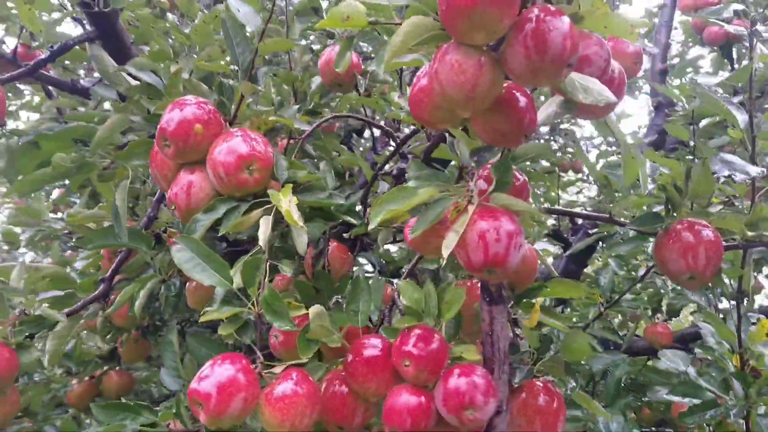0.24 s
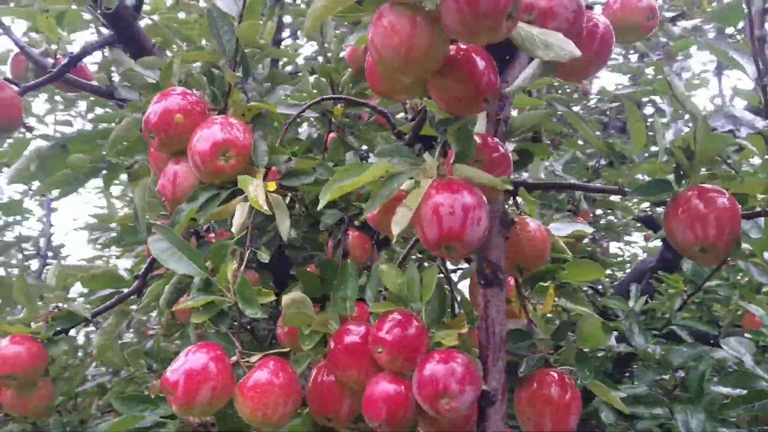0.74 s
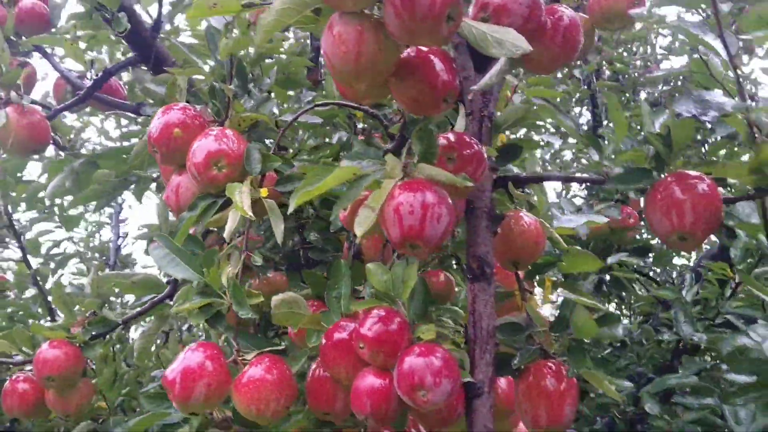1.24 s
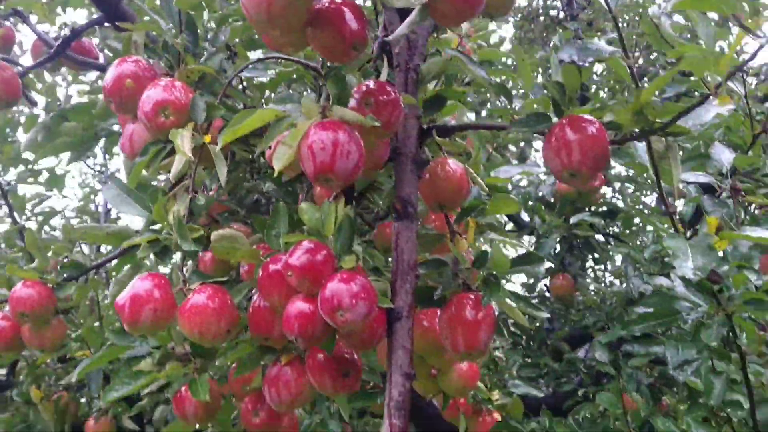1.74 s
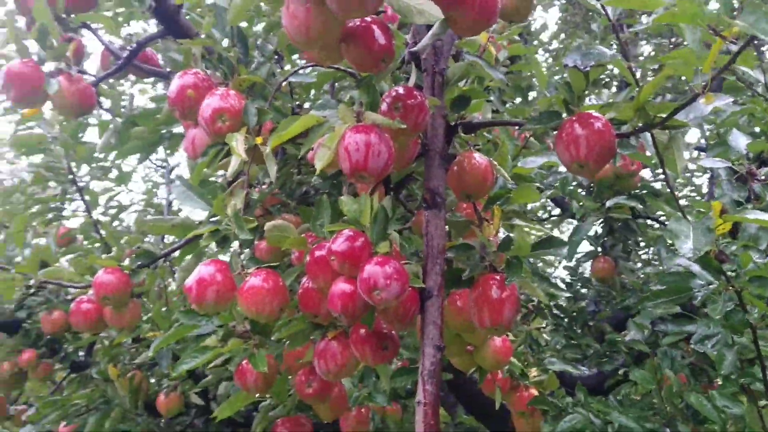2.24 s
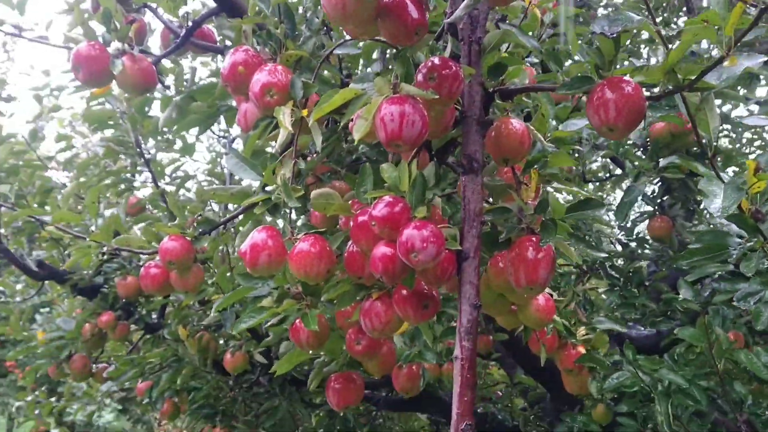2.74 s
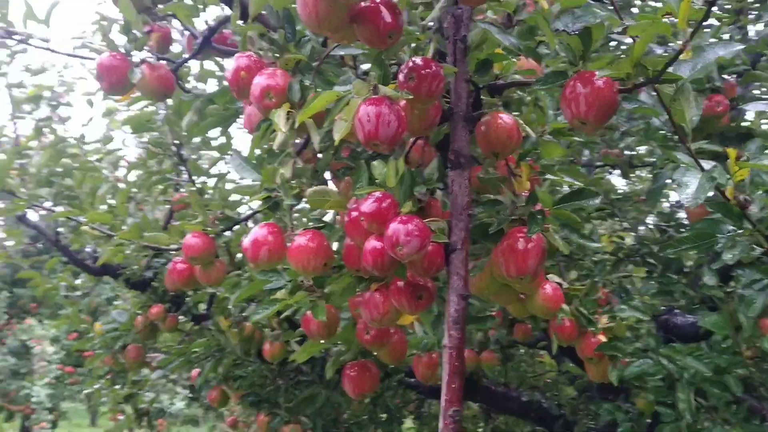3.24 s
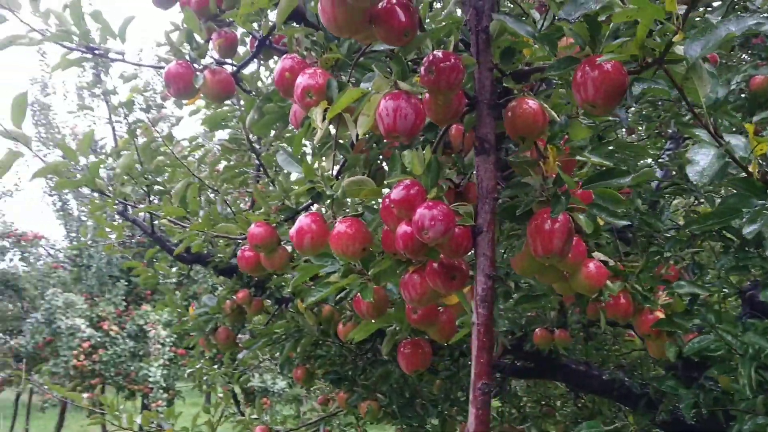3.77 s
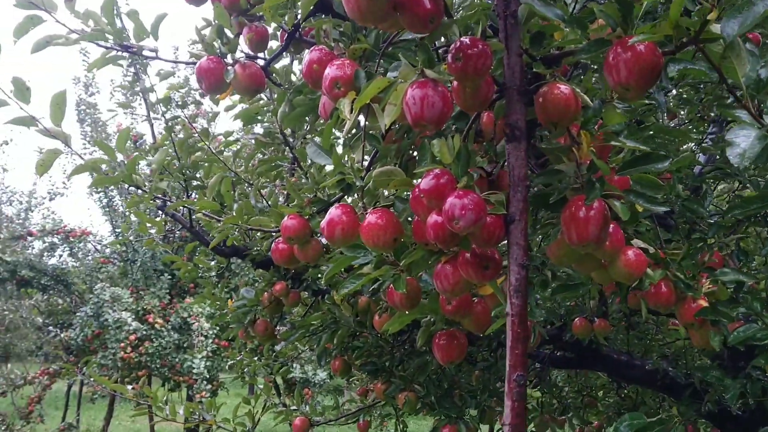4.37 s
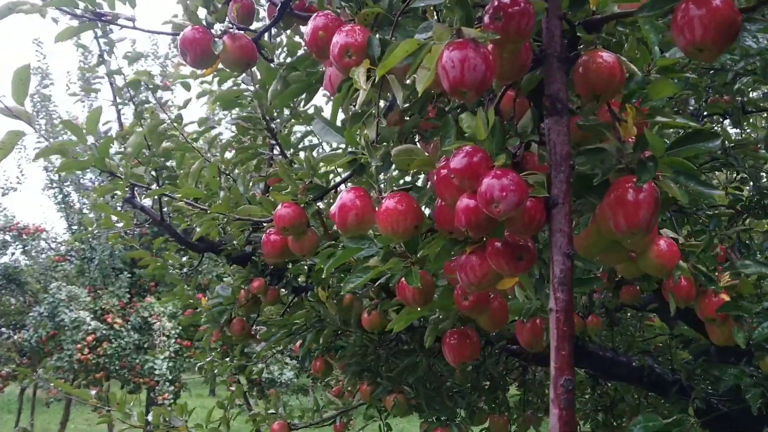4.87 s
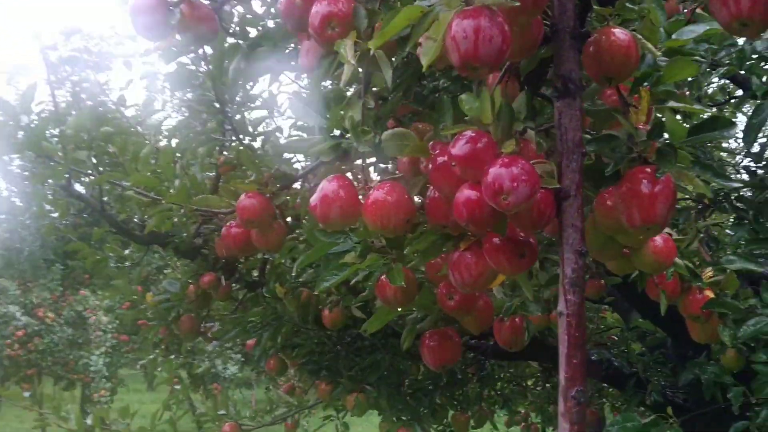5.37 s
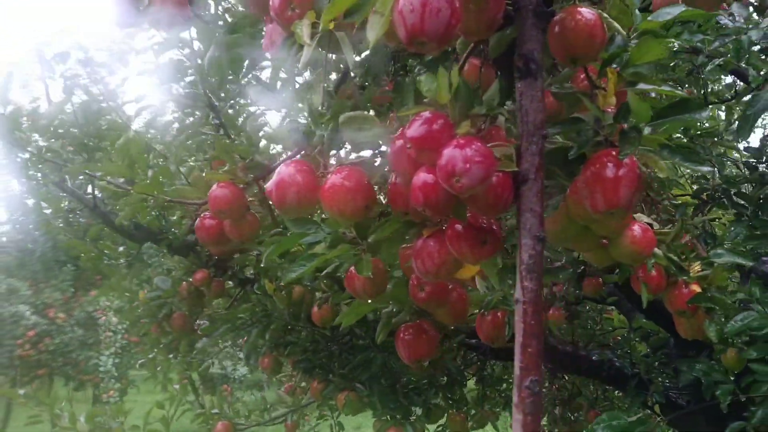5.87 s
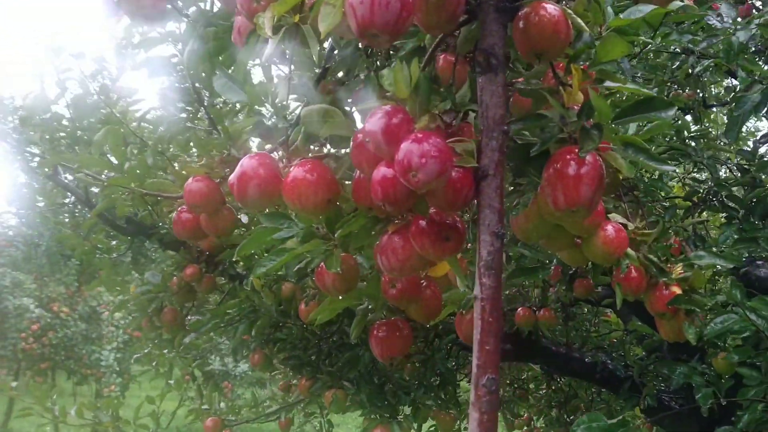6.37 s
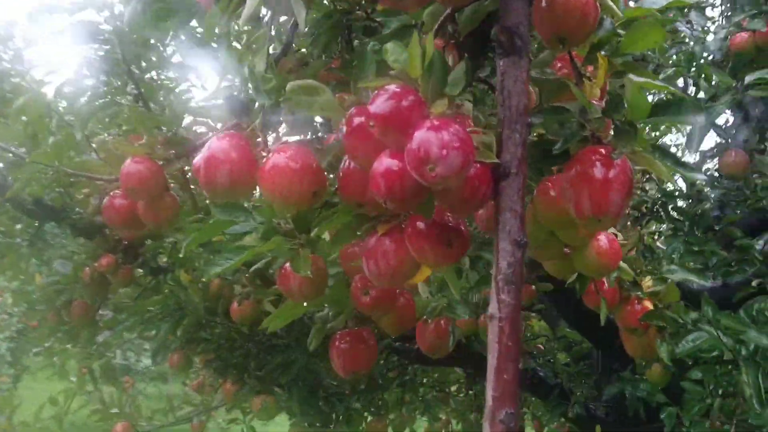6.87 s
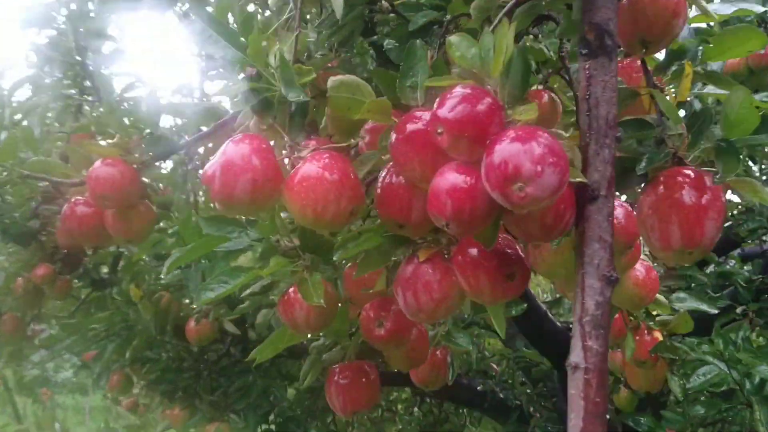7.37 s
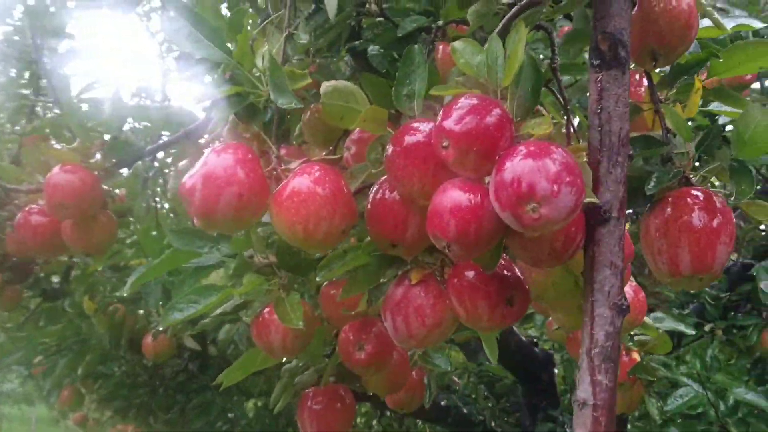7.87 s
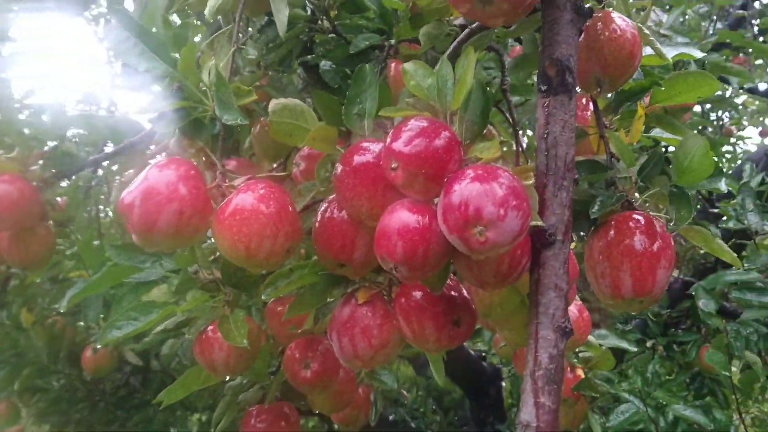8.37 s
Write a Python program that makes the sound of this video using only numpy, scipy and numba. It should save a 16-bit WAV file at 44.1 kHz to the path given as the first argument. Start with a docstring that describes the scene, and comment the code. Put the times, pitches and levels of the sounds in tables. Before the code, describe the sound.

Rain falls on apple tree leaves in an orchard, caught by a hand-held phone. Scattered sharp drops come first, then crowd into a dense patter with loud smacks, bright splashes and fine spatter, strongest around two and a half seconds. After four seconds it thins to light drips over a soft far hiss. One microphone side is muffled by a finger, which thumps briefly as it shifts.

```python
"""Big drops smack wet leaves close to a hand-held phone, in an orchard in the rain. Each is a set of swelling, dying
rings: leaf, thuds and splash. Smaller rings make a dense patter, fine spatter, splashes and hollow knocks on fruit.
Coloured noise makes the wash of the next trees, the hiss of the far rows and a low rumble, which holds a hum at first.
A finger covers the left microphone port: a filter makes that side faint, with a ring of trapped air,
and short pressure pulses thump there when the finger shifts."""
import sys
import numpy as np
from scipy import signal
from scipy.fft import rfft, irfft
from scipy.io import wavfile
from scipy.ndimage import uniform_filter1d
from numba import njit

SR = 44100
rng = np.random.default_rng(int(sys.argv[2]) if len(sys.argv) > 2 else 0)


def store_pcm(level_fs):
    """Save levels as 16-bit WAV."""
    pcm = np.round(np.clip(level_fs, -1, 1) * 32767).astype(np.int16)
    wavfile.write(sys.argv[1], SR, np.atleast_2d(pcm).T)


N = 379701  # length in samples

# big drops on leaves nearby, ahead of the body colour of close drops: (time [s], ring peak [dB], leaf pitch [Hz])
DROPS = [(0.1009, -18, 1980), (0.1517, -23.5, 1660), (0.1592, -8.5, 1670), (0.1776, -26, 1540),
         (0.192, -18.0, 2020), (0.2048, -15.0, 1870), (0.234, -28, 1450), (0.2587, -24.5, 1340),
         (0.2802, -19.5, 2030), (0.3319, -18, 1790), (0.3532, -22, 1600), (0.4384, -21, 1660),
         (0.5472, -33, 1500), (0.5616, -19.5, 1700), (0.609, -27.0, 1600), (0.622, -29, 2510),
         (0.6703, -24, 1630), (0.726, -24, 1470), (0.7404, -24, 2020), (0.7555, -26.5, 1630),
         (0.8036, -27, 1910), (0.8376, -18.5, 2070), (0.857, -12.5, 2010), (0.879, -13.5, 1840),
         (0.898, -14.5, 1890), (0.9756, -17, 1800), (1.0328, -5.5, 1740), (1.0689, -12.5, 1830),
         (1.078, -16, 1670), (1.0872, -12.5, 1680), (1.1162, -12.0, 1910), (1.1755, -15, 2040),
         (1.1971, -14.5, 1910), (1.2377, -13, 2080), (1.2976, -18.0, 1980), (1.3404, -12.5, 1800),
         (1.3546, -15, 1970), (1.3655, -19.0, 2200), (1.3976, -16, 1720), (1.416, -15.5, 2020),
         (1.4246, -12, 1800), (1.4376, -14.0, 1830), (1.4829, -17, 1770), (1.5101, -16, 2060),
         (1.546, -14.5, 1820), (1.5639, -14.5, 1830), (1.6359, -19.5, 1930), (1.6758, -18.5, 1700),
         (1.7031, -17.5, 1930), (1.7398, -18, 2270), (1.8454, -19, 1600), (1.8566, -16, 1860),
         (1.8957, -13, 2040), (1.9634, -18, 1580), (1.9887, -16.5, 1800), (2.0073, -11, 1900),
         (2.122, -15, 1740), (2.135, -7.5, 2030), (2.1449, -13.5, 1990), (2.1743, -8, 1830),
         (2.1941, -11.0, 1940), (2.2324, -14, 2030), (2.2658, -12, 2040), (2.2885, -11.5, 1570),
         (2.302, -9.0, 1640), (2.3428, -12.0, 1770), (2.3746, -11, 1800), (2.3878, -10, 2140),
         (2.4233, -1.5, 1860), (2.44, -6.5, 2120), (2.4925, -4, 1910), (2.5041, -14, 1830),
         (2.5518, -17.5, 1800), (2.584, -13, 1810), (2.648, -3.5, 2240), (2.72, -11.5, 2140),
         (2.74, -9.5, 2130), (2.7617, -8, 2150), (2.7924, -12.5, 1660), (2.811, -11.5, 2040),
         (2.8358, -12, 1850), (2.8768, -13.5, 1970), (2.901, -8.5, 2140), (2.9177, -17, 2220),
         (2.9779, -17, 1890), (3.0033, -13.5, 2170), (3.0383, -13, 2110), (3.2131, -10.5, 1870),
         (3.2394, -12.5, 1800), (3.2986, -10.5, 2010), (3.3118, -10.5, 2020), (3.347, -7.5, 2250),
         (3.3988, -11, 1820), (3.5663, -13, 1950), (3.579, -15, 1870), (3.5953, -10.5, 2150),
         (3.6494, -10, 2100), (3.6683, -9.5, 2080), (3.6865, -14.0, 2170), (3.6931, -17.5, 2020),
         (3.7728, -11.5, 1950), (3.8005, -12.5, 1920), (3.8281, -14.5, 2070), (3.8985, -18.5, 1660),
         (3.936, -16.0, 1920), (3.9559, -9.5, 2130), (3.99, -16.0, 2090), (4.065, -13.5, 1430),
         (4.0773, -21, 1340), (4.1606, -17.5, 2170), (4.1723, -17.5, 1580), (4.2016, -19, 2110),
         (4.2847, -21.0, 1970), (4.303, -19.5, 1880), (4.3234, -14.5, 1670), (4.333, -19, 2120),
         (4.3731, -22, 2030), (4.397, -14.5, 1650), (4.547, -20, 1810), (4.567, -23, 1550),
         (4.7889, -20, 1750), (4.8092, -20.0, 2080), (4.8921, -22.5, 1440), (4.9695, -26.0, 2240),
         (5.0014, -26.5, 1390), (5.0384, -33, 1620), (5.0688, -28.0, 1900), (5.0823, -27, 1900),
         (5.1277, -28, 1770), (5.2519, -29, 1910), (5.3427, -22.5, 1970), (5.3723, -26.5, 1660),
         (5.3821, -22, 1900), (5.4737, -20, 1570), (5.5207, -24.0, 1730), (5.5298, -23, 1760),
         (5.547, -18.5, 1760), (5.6517, -20, 1500), (5.706, -17.5, 1560), (5.7358, -15, 1810),
         (5.7481, -22, 1880), (5.7999, -32, 1660), (5.8554, -34, 1400), (5.903, -27, 1870),
         (5.9225, -24.5, 1440), (5.9641, -26.5, 1980), (5.9723, -31, 2040), (6.0329, -27.5, 1410),
         (6.0494, -27, 1370), (6.0653, -25, 1870), (6.0767, -21.5, 1400), (6.105, -27, 1610),
         (6.224, -29.5, 1560), (6.2733, -28.0, 1480), (6.2936, -26, 1390), (6.3861, -32, 1310),
         (6.493, -30, 1300), (6.5179, -23.5, 1320), (6.5347, -28, 1960), (6.5479, -30, 1490),
         (6.6813, -27.5, 2140), (6.6907, -24, 1160), (6.7145, -29.5, 1300), (6.876, -33.5, 1460),
         (6.971, -33.0, 1900), (7.0134, -31, 1700), (7.0814, -33.0, 1790), (7.099, -30, 1410),
         (7.1127, -27, 1540), (7.166, -37, 1820), (7.3293, -35.5, 1390), (7.3417, -32, 2360),
         (7.3662, -37.5, 1240), (7.4469, -31.5, 1420), (7.5353, -34, 1910), (7.5486, -31, 1600),
         (7.6382, -35.5, 1890), (7.7703, -37, 2170), (7.7999, -32.5, 1930), (7.8965, -33.5, 1920),
         (7.9561, -28.5, 1370), (8.1714, -33.5, 1670), (8.1933, -29.5, 2920), (8.446, -33, 1380),
         (8.5016, -37.5, 1370), (8.571, -34, 1950), (8.591, -34.5, 1710)]

# ring of a middling leaf: pitch [Hz], length [cycles], upward glide [share of the starting pitch per cycle]
LEAF_HZ, LEAF_CYCLES, LEAF_GLIDE = 1917, 3.88, 0.18
SPLASH_HZ, SPLASH_CYCLES = 7240, 14.4


def undb(db):
    """Turn dB into gain."""
    return 10 ** (np.asarray(db) / 20)


def level(x, db):
    """Set the rms level over all of x."""
    return x * undb(db) / np.sqrt(np.mean(x ** 2))


def colour(x, points):
    """Filter causally through (Hz, dB) points: the folded cepstrum of the log gain gives minimum phase."""
    hz, db = np.transpose(points)
    size = 4096
    grid_hz = np.maximum(np.arange(size // 2 + 1) * SR / size, 1)
    log_gain = np.interp(np.log(grid_hz), np.log(hz), db) * np.log(10) / 20
    cepstrum = irfft(log_gain)
    cepstrum[1:size // 2] *= 2
    cepstrum[size // 2 + 1:] = 0
    response = irfft(np.exp(rfft(cepstrum)))
    return signal.fftconvolve(x, response)[:N]


def coloured_noise(points):
    """White noise through a colour."""
    return colour(rng.standard_normal(N), points)


def walk(rate):
    """Random levels held 1 / rate s and slewed twice; spread near 1."""
    hold = int(SR / rate)
    steps = np.repeat(rng.standard_normal(N // hold + 1), hold)
    return np.sqrt(2) * uniform_filter1d(uniform_filter1d(steps, hold), hold)[:N]


@njit
def grains(s, hz, cycles, size, glide, length):
    """Rings that swell to their peak at s while the drop spreads, glide up by a share each cycle and die away."""
    out = np.zeros(length)
    for k in range(len(s)):
        turn = hz[k] / SR
        decay = 10 * turn / cycles[k]
        step = np.exp(2j * np.pi * turn - decay)
        bend = np.exp(2j * np.pi * glide[k] * turn * turn)
        z = size[k] * decay * np.e + 0j  # brings the top of the swell to size
        start = int(s[k] * SR - 1 / decay)
        for j in range(min(int(10 / decay), length - start)):
            out[max(start + j, 0)] += j * z.imag
            z *= step
            step *= bend
    return out


def steady_rings(s, hz, cycles, db):
    """Rings of one length in cycles that hold their pitch."""
    return grains(s, hz, np.full(len(s), float(cycles)), undb(db), 0 * s, N)


def thud_level(hz, chance):
    """Thud over ring [dB]: larger, lower leaves give more under a drop."""
    middle_db, db_per_octave, spread_db = -10.5, -18, 1.5
    return middle_db + db_per_octave * np.log2(hz / LEAF_HZ) + spread_db * chance


def smack(s, db, hz, thud_db, splash_db, count=4, shiver_ms=2.1, shiver_db=-15, port_lag_ms=0.18):
    """Each drop rings its leaf, thuds and splashes; droplets and neighbours answer for a few ms."""
    # what gives under a drop, the leaf blade, its stalk and the twig:
    # (middle pitch [Hz], length [cycles], level within the thud [dB])
    thud_parts = [(1056, 4.7, -0.5), (595, 5.4, -3.5), (296, 3.72, -6)]
    crack_hz, crack_db = 3360, -23.5
    n = len(s)
    a, b = rng.standard_normal((n, 6)).T, rng.standard_normal((n, count)).T
    wait = rng.exponential(size=(n, count)).T
    later = s + shiver_ms / 1000 * (.3 + wait)

    # each row: peak time [s], pitch [Hz], length [cycles], peak [dB]
    # the first touch cracks above the ring of the leaf
    rows = [(s, crack_hz * np.exp(0.25 * b[-1]), np.full(n, 3.2), db + crack_db)]
    # the ring starts below its pitch and glides through it
    rows.append((s, 0.84 * hz, LEAF_CYCLES * np.exp(.2 * a[0]), db))
    rows.append((s, SPLASH_HZ * np.exp(0.11 * a[2]), np.full(n, SPLASH_CYCLES), db + splash_db))
    # the finest droplets tick far up
    tick_db = db + splash_db - 13.0 + 2.9 * b[1]
    rows.append((s, 2.8 * SPLASH_HZ * np.exp(0.16 * b[0]), np.full(n, 5.0), tick_db))
    for (thud_hz, cycles, rel_db), chance in zip(thud_parts, (a[5], a[1], a[4])):
        # the slower swell of a thud peaks later
        peak_s = s + cycles / thud_hz / 20
        rows.append((peak_s, thud_hz * np.exp(0.31 * chance), np.full(n, cycles), db + thud_db + rel_db))
    for k in range(count):
        fade_db = db + shiver_db - 1.0 * wait[k]
        leaf_hz = np.clip(hz * np.exp(0.48 * b[k]), 300, 4200)
        droplet_hz = SPLASH_HZ * np.exp(0.19 * b[k - 1])
        rows.append((later[k], leaf_hz, np.full(n, 1.38 * LEAF_CYCLES), fade_db))
        rows.append((later[k], droplet_hz, np.full(n, SPLASH_CYCLES), fade_db + splash_db + 8.5))
    t, f, cycles, peak_db = (np.concatenate(column) for column in zip(*rows))

    # drops fall on all sides, so each reaches the two ports at its own lag
    lag = np.tile(port_lag_ms / 1000 * a[3], len(rows))
    # leaves tighten as they spring back; the splash keeps its pitch
    glide = LEAF_GLIDE * (f < 5000)
    f = np.minimum(f, SR / 3)
    return np.array([grains(t + shift, f, cycles, undb(peak_db), glide, N) for shift in (lag, 0 * lag)])


def flurries():
    """Gain of the extra patter after each big drop: branches shed their water in bunches."""
    decay_ms, flurry_db = 8.4, -18  # decay of power; level relative to the drop's peak
    s, db = np.transpose(DROPS)[:2]
    power = np.zeros(N)
    power[(s * SR).astype(int)] = undb(2 * (db + flurry_db))
    return np.sqrt(signal.lfilter([1], [1, -np.exp(-1000 / (decay_ms * SR))], power))


def rumble(low_db):
    """A faint low roll from far away: bass noise, at first with a wavering sine hum in it."""
    # faint hum: (middle pitch [Hz], amplitude [dB], time at which it has faded to half [s])
    hum_settings = (92, -52.5, 0.95)
    hz, db, end = hum_settings
    roll = coloured_noise([(25, -2), (50, -2.5), (95, 0.0), (125, 1.5), (170, -7.5), (300, -17.0), (1000, -65)])
    t = np.arange(N) / SR
    phase = 2 * np.pi * np.cumsum(hz + 1.0 * walk(3.5)) / SR
    hum = np.sin(phase) / (1 + (t / end) ** 8)
    return level(roll, 0) * undb(low_db) + undb(db) * hum


def hiss(far_db):
    """Countless far drops merge into noise that flickers a little, unrelated at the two ports."""
    # colour of the far rows: (frequency [Hz], gain [dB])
    hiss_colour = [(90, -18.5), (200, -6), (500, -4), (1200, -3.5), (2200, -2.5), (3200, -7.5),
                   (4000, -4.5), (5000, -10), (7300, -8), (9500, -16.5), (16000, -24)]
    # a shaken twig throws off fine spray: (time [s], half-length to 1/e [s], gain over the treble of the hiss [dB])
    twig_spray = (5.57, 0.027, 8)
    x = np.array([coloured_noise(hiss_colour) for _ in range(2)])
    s, length, db = twig_spray
    treble = signal.sosfilt(signal.butter(2, SPLASH_HZ, "high", fs=SR, output="sos"), x)
    burst = np.exp(-((np.arange(N) / SR - s) / length) ** 2)
    x = x + undb(db) * burst * treble
    return level(x, 0) * undb(far_db + .5 * walk(38) + 1.35 * walk(150))


def wash(near_db):
    """Drops on the next trees, too dense to tell apart: soft noise that swells with the near patter."""
    # colour of the next trees: (frequency [Hz], gain [dB])
    wash_colour = [(150, -22), (500, -5), (1300, -8.5), (2200, -2.5), (3300, -15), (4900, -41), (7200, -38),
                   (16000, -44)]
    x = np.array([coloured_noise(wash_colour) for _ in range(2)])
    return level(x, -7.5) * undb(near_db + 2.4 * walk(14))


def spatter(near_db):
    """Fine droplets burst on wet leaves: tiny bright rings in uneven bursts, a few reaching far up."""
    per_s, rel_db = 770, -22.5  # level relative to the near patter
    size_spread_db, pitch_spread = 3, 0.11
    count = int(per_s * N / SR)
    place, a = rng.integers(0, N, count), rng.standard_normal(count)
    big = rng.exponential(size=(count, 2)).T
    hz = np.minimum(SPLASH_HZ * np.exp(pitch_spread * a + 0.22 * big[1]), SR / 3)
    db = size_spread_db * big[0] + 3.5 * walk(14)[place]
    x = steady_rings(place / SR, hz, 7.0, db)
    return level(x, rel_db) * np.hypot(undb(near_db), flurries())


def patter(near_db):
    """Up to hundreds of smaller drops a second; in thin rain fewer fall and mostly broad low leaves drip."""
    per_s, size_spread_db, pitch_spread = 230, 4, 0.2
    # below the full level the pitch falls by octaves per dB, and the count halves every so many dB
    full_db, octaves_per_db, halves_db = -40, .012, 9
    count = int(per_s * N / SR)
    place, a = rng.integers(0, N, count), rng.standard_normal((count, 3)).T
    big = rng.exponential(size=count)
    thin_db = np.minimum(near_db[place] - full_db, 0)
    share = 2 ** (thin_db / halves_db)
    falls = rng.random(count) < share
    # fewer drops are each made larger, which keeps the mean power
    db = size_spread_db * np.minimum(big, 1.3) + 1.5 * walk(12)[place] - 10 * np.log10(share)
    leaf_hz = LEAF_HZ * 2 ** (octaves_per_db * thin_db)
    hz = leaf_hz * np.exp(pitch_spread * np.clip(a[0], -3, 2.2))
    drops = (place / SR, db, hz, thud_level(leaf_hz, a[1]), -17 + 1.3 * a[2])
    x = smack(*(column[falls] for column in drops), count=2)
    return level(x, 0) * np.hypot(undb(near_db), flurries())


def knocks():
    """Heavy drops knock hollow on fruit: short low rings."""
    # struck fruit: (time [s], peak [dB], pitch [Hz])
    fruit_knocks = [(1.036, -26, 332), (4.069, -16, 350), (4.078, -21, 290)]
    s, db, hz = np.transpose(fruit_knocks)
    return steady_rings(s, hz, 5, db)


def splashes():
    """Sharp splashes close by: a bright ring with a snap below it and a fine tick above."""
    # close splashes: (time [s], level [dB])
    close_splashes = [(0.16, -15.5), (0.192, -24), (0.5615, -28), (0.8597, -25), (1.0687, -19.5),
                      (1.116, -19), (1.3198, -24), (2.0079, -36), (2.1353, -37), (2.1446, -32),
                      (2.2884, -25), (2.302, -22), (2.3877, -36), (2.4236, -16), (2.4928, -30),
                      (2.6474, -11.5), (2.739, -18), (2.9004, -22), (3.347, -33), (3.3988, -25),
                      (3.6491, -25), (3.6687, -24), (3.6863, -18), (3.7725, -27.5), (3.956, -23),
                      (4.1601, -35), (4.5482, -22), (5.3422, -26), (5.567, -29), (8.191, -35)]
    s, db = np.transpose(close_splashes)
    a = rng.standard_normal((len(s), 3)).T
    parts = [(SPLASH_HZ, 14.0, -2), (4000, 8.0, -8), (13000, 9.0, -4)]  # (pitch [Hz], length [cycles], level [dB])
    return sum(steady_rings(s, hz * np.exp(0.062 * chance), cycles, db + rel_db)
               for (hz, cycles, rel_db), chance in zip(parts, a))


def big_drops():
    """The drops that stand out: each smacks a leaf of its own pitch."""
    s, db, hz = np.transpose(DROPS)
    a = rng.standard_normal((len(s), 2)).T
    return smack(s, db, hz, thud_level(hz, a[0]), -25 + 4.2 * a[1])


def canopy(x, t60_ms=55, wet_db=-15):
    """The leaves all round scatter each sound back as a short diffuse tail."""
    t = np.arange(SR // 5) / SR
    tail = rng.standard_normal(len(t)) * np.exp(-np.log(1000) * t * 1000 / t60_ms)
    return x + undb(wet_db) * signal.fftconvolve(x, tail / np.linalg.norm(tail))[:N]


def phone_body(x):
    """Small leaves radiate little bass; the phone's body takes a dip out of close sounds near 5 kHz."""
    body = [(40, -29.0), (170, -8.5), (1300, -2.0), (2300, 2.0), (3200, -1.0), (3900, 2.0),
            (4900, -14.0), (6200, -1.0), (9500, -2.0), (16000, -21.0)]
    return colour(x, body)


def covered_port(x):
    """The finger dulls the left port, and the air trapped under it lifts a band near 1750 Hz."""
    # what passes the finger: (frequency [Hz], gain [dB])
    finger_colour = [(40, -7), (110, -23), (400, -23), (1000, -24), (1400, -20), (1750, -17), (2300, -33.5),
                     (3300, -35.5), (5000, -44), (16000, -36)]
    return colour(x, finger_colour)


def finger():
    """Each shift pushes air into the port: a sudden rise, a fall set by the push length, a ring of the pocket."""
    # finger shifts: (time [s], pulse peak ahead of smoothing [dB], push length [ms])
    finger_bumps = [(2.089, -16, 0.51), (2.1326, -21.5, 0.49), (2.254, -21, 0.55), (2.263, -21, 0.82),
                    (2.3068, -5, 0.43), (2.3168, -22, 2), (2.35, -16.5, 1.6), (2.519, -25, 2.5)]
    t, pushes = np.arange(N) / SR, np.zeros(N)
    for s, db, ms in finger_bumps:
        near = slice(int(s * SR) - 200, int(s * SR) + 600)
        age = (t[near] - s) * 1000 / ms  # in push lengths
        pulse = np.where(age < 0, np.exp(-(age / 0.27) ** 2), np.exp(-np.abs(age) / 1.9))
        pushes[near] += undb(db) * pulse
    pushes = signal.sosfilt(signal.butter(2, 3000, fs=SR, output="sos"), pushes)
    s, db, ms = np.transpose(finger_bumps)
    # short pushes ring the pocket harder
    ring_size = undb(db - 14) * 0.4 / ms
    return pushes + grains(s, np.full(len(s), 1750.), np.full(len(s), 14.), ring_size, 0 * s, N)


def scene():
    """Everything reaches the right port openly, the left through the finger."""
    # course of the rain; flurries, flicker and the body colour of close drops come on top:
    # (time [s], near patter [dB], far hiss [dB], rumble [dB])
    rain_course = [(0.0, -43, -49, -56), (0.15, -38.5, -44, -41.5), (0.5, -49, -46, -60.5),
                   (0.8, -43, -46, -54), (1.3, -36, -44.5, -54.5), (1.9, -39, -49, -61),
                   (2.35, -32.5, -46, -49), (2.8, -33.5, -43, -48.5), (3.1, -33, -46.5, -57),
                   (3.75, -37.5, -47, -55.5), (4.3, -38, -49, -55.5), (4.7, -47.5, -48.5, -59),
                   (5.049, -44, -50.5, -56.5), (5.25, -52.5, -48.5, -59), (5.65, -41, -48, -53.5),
                   (6.35, -50, -50, -58), (7.0, -56, -49.5, -59.5), (7.8, -61, -52, -62),
                   (8.6, -62, -52, -59)]
    t = np.arange(N) / SR
    s, *columns = np.transpose(rain_course)
    near_db, far_db, low_db = (np.interp(t, s, column) for column in columns)
    background = rumble(low_db) + hiss(far_db) + wash(near_db)
    drops = spatter(near_db) + patter(near_db) + knocks() + splashes() + big_drops()
    close = np.array([phone_body(canopy(x)) for x in drops])
    left, right = close + background
    return np.array([covered_port(left) + finger(), right])


def record(dry):
    """Microphone self-noise, a bass cut, rounding of the loudest peaks and a steep top cut."""
    noise = np.array([coloured_noise([(100, 17.5), (5000, -3.0), (16000, -5.5)]) for _ in range(2)])
    x = dry + undb(-75.5) * noise
    x = signal.sosfilt(signal.butter(2, 75, "high", fs=SR, output="sos"), x)
    x = x / (1 + x ** 4) ** .25
    return signal.sosfilt(signal.ellip(12, .2, 90, 15800, fs=SR, output="sos"), x)


dry = scene()
out = record(dry)
store_pcm(out)
```